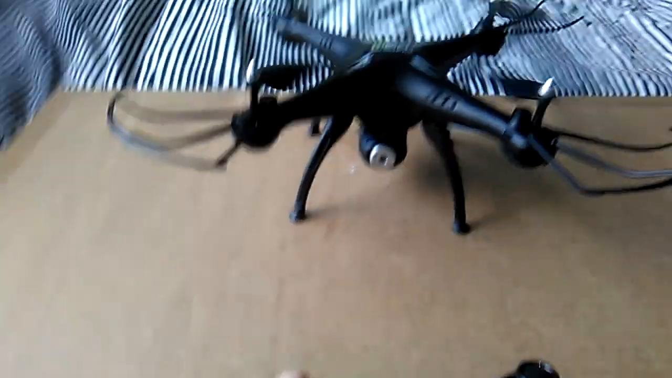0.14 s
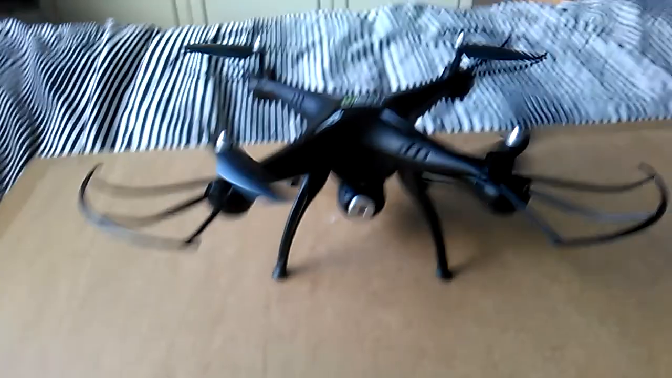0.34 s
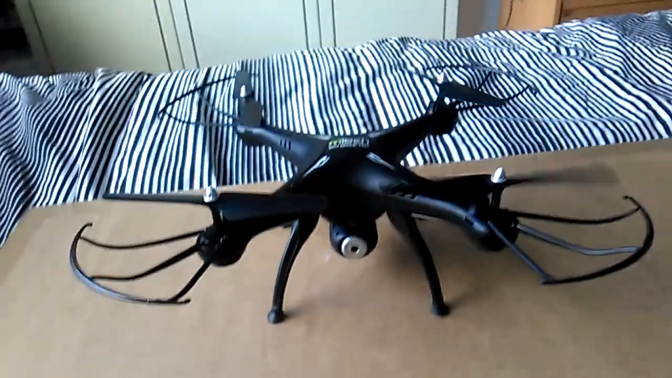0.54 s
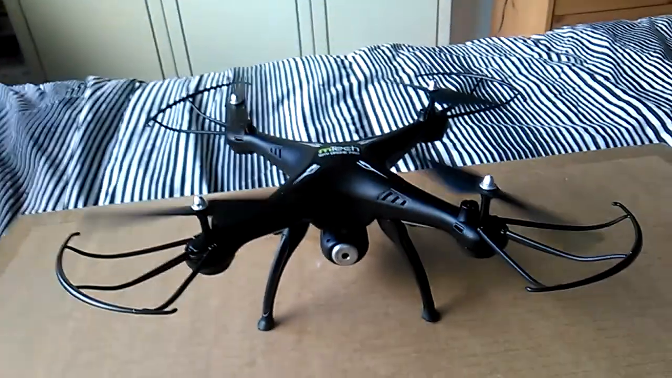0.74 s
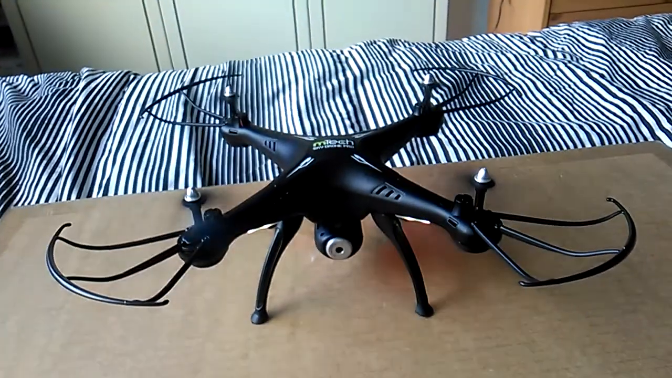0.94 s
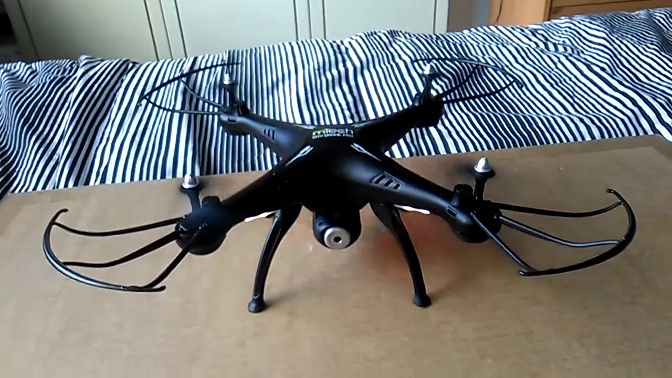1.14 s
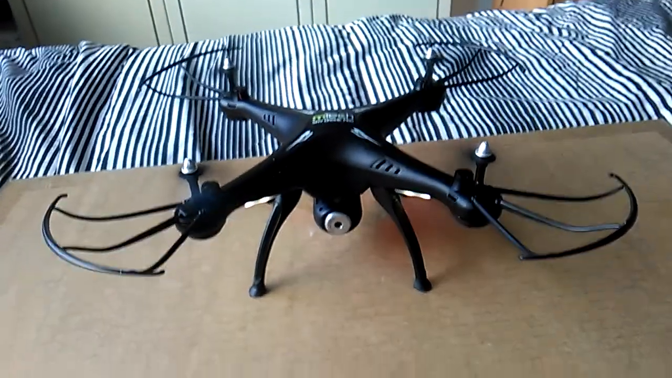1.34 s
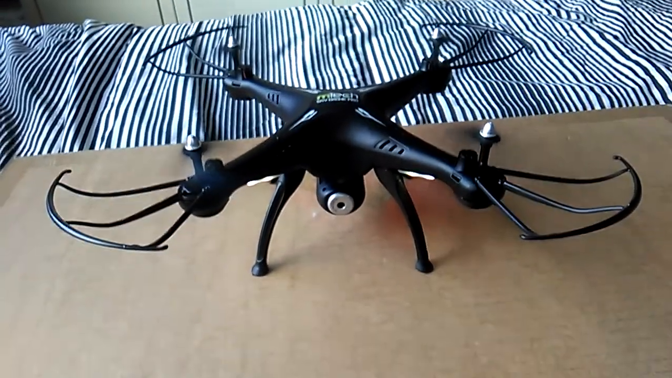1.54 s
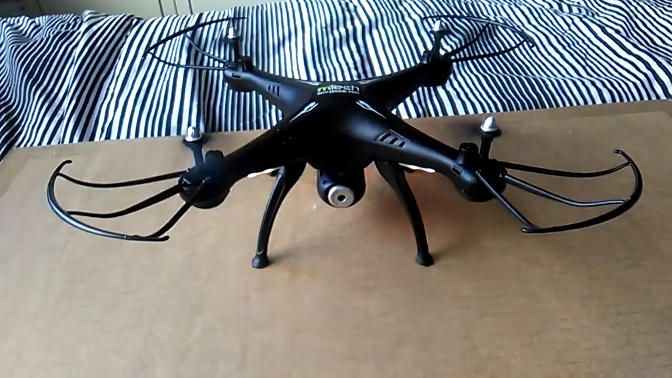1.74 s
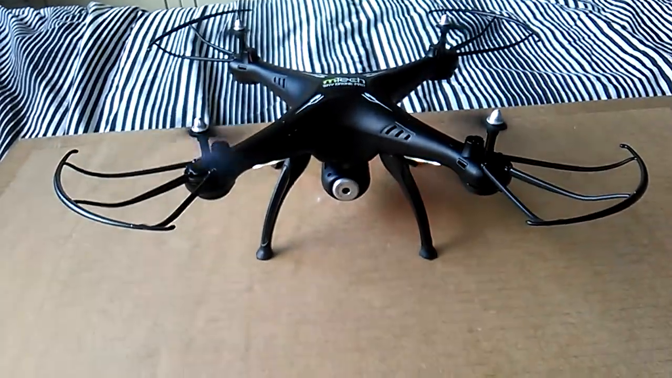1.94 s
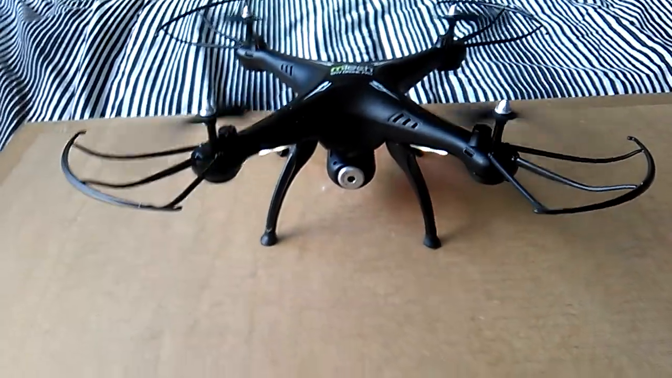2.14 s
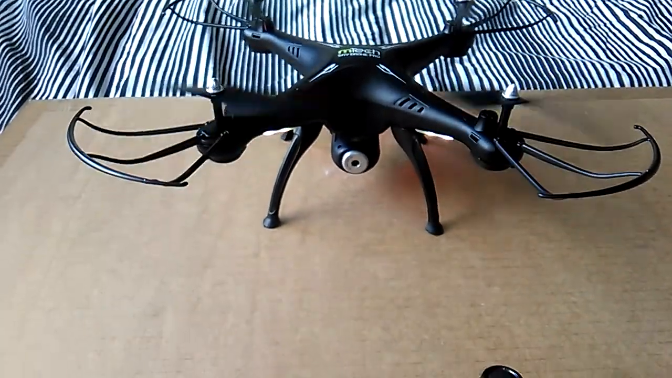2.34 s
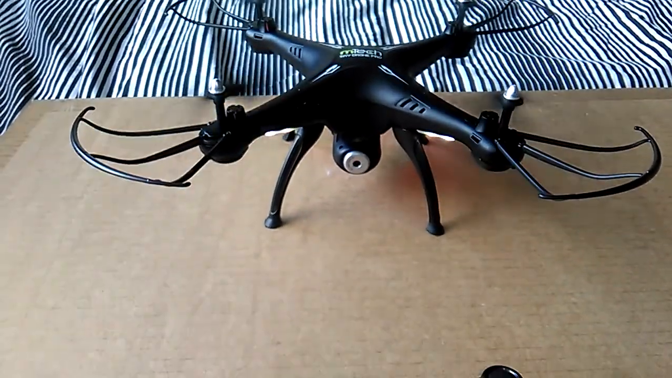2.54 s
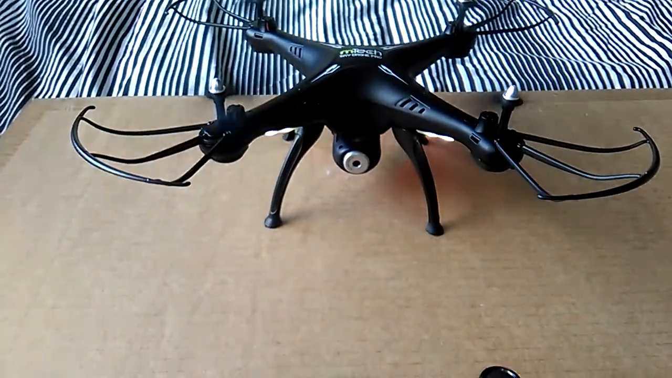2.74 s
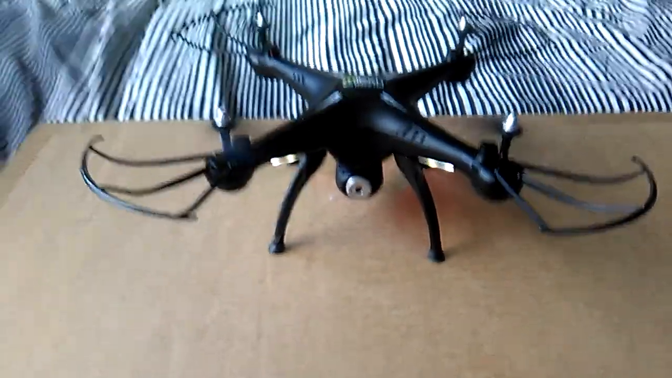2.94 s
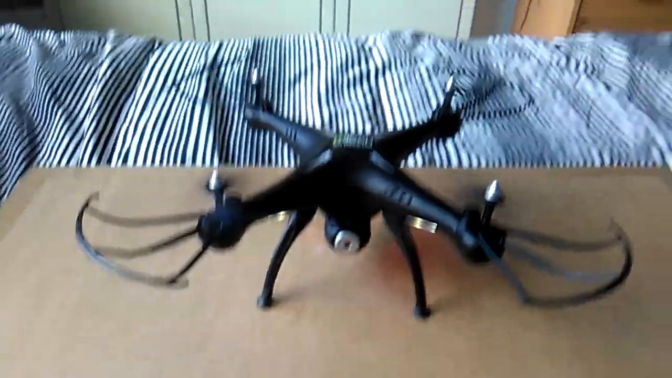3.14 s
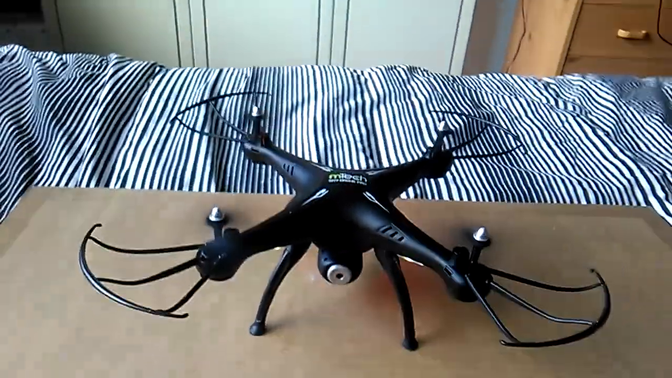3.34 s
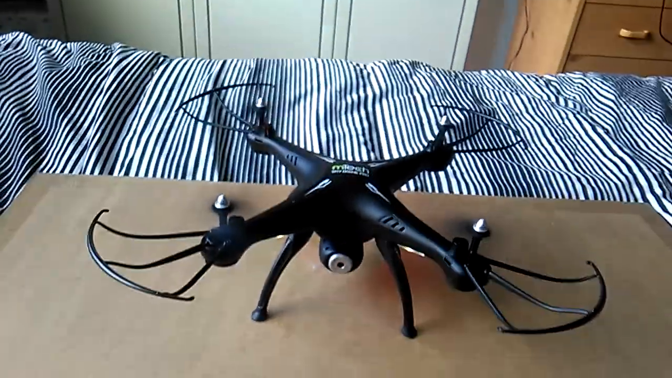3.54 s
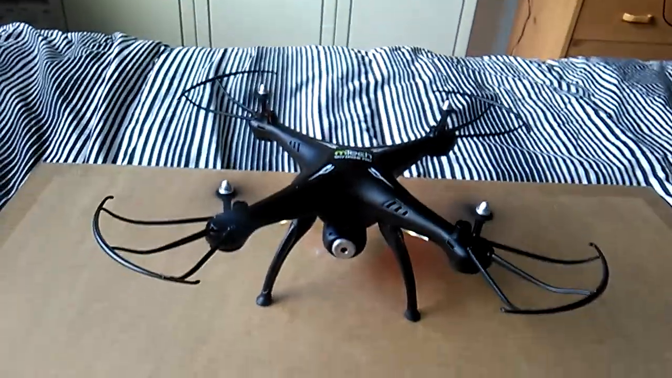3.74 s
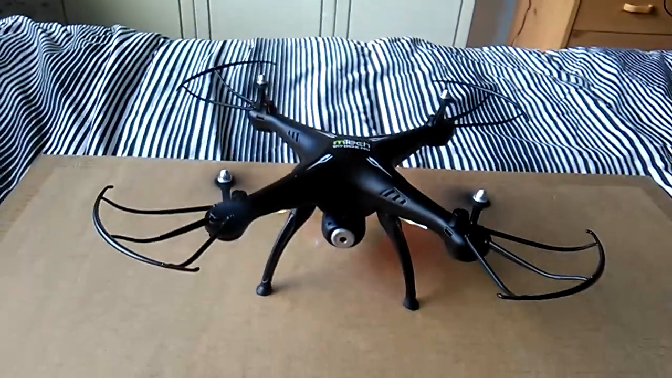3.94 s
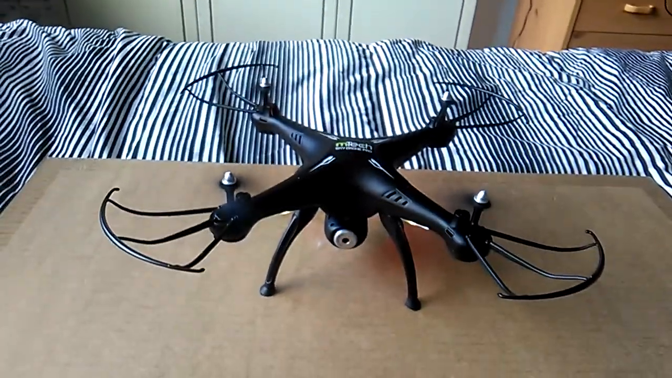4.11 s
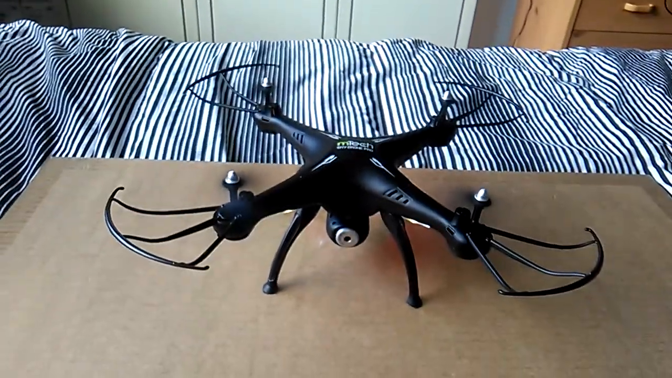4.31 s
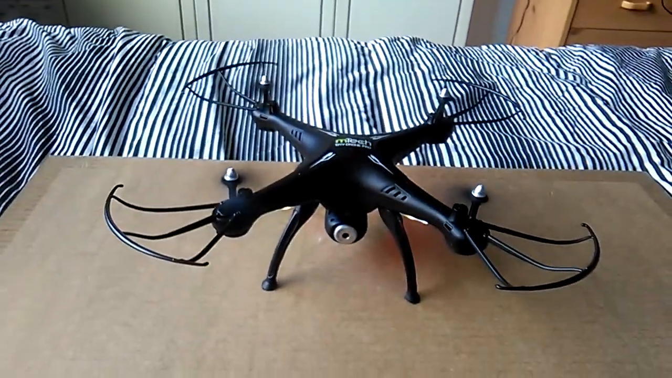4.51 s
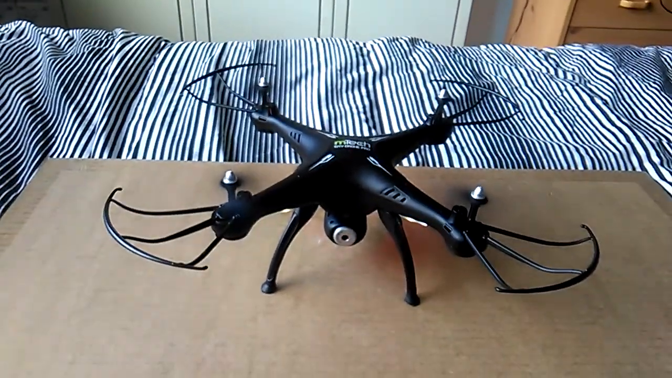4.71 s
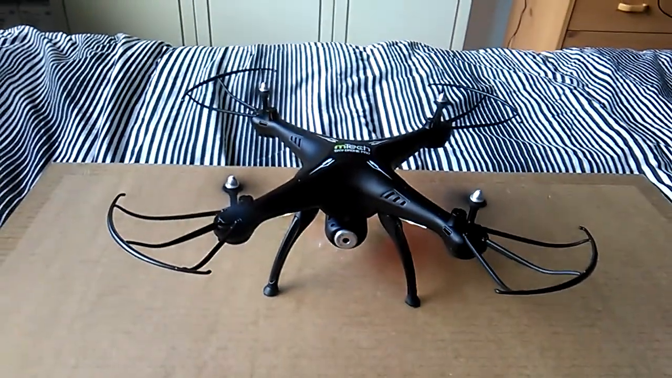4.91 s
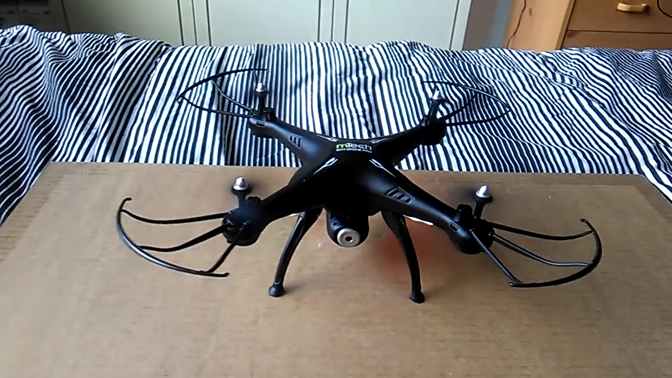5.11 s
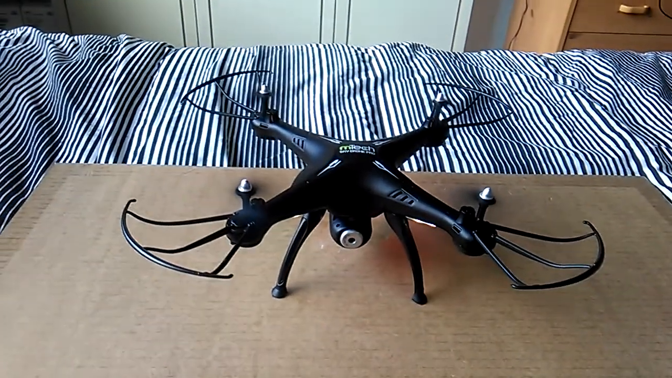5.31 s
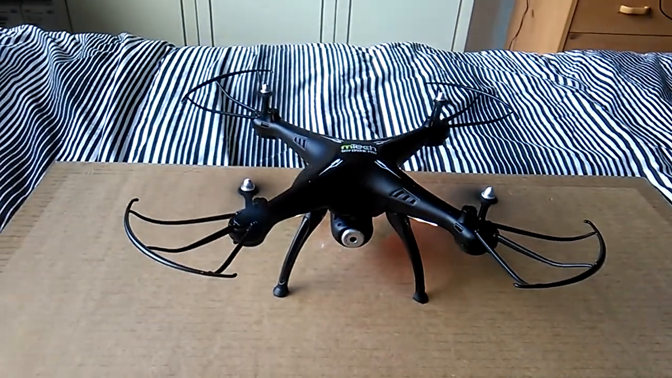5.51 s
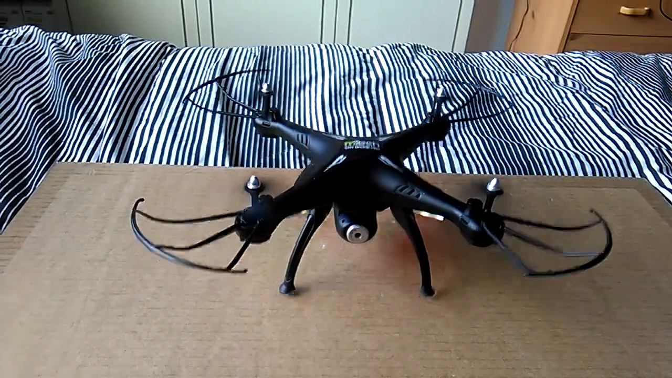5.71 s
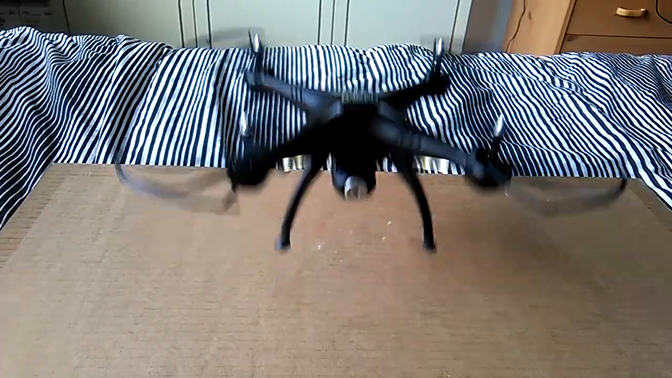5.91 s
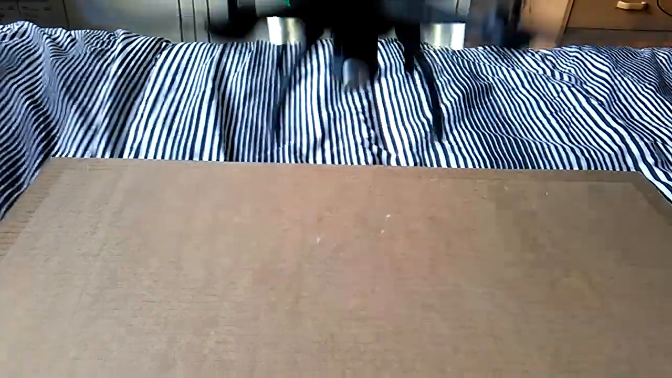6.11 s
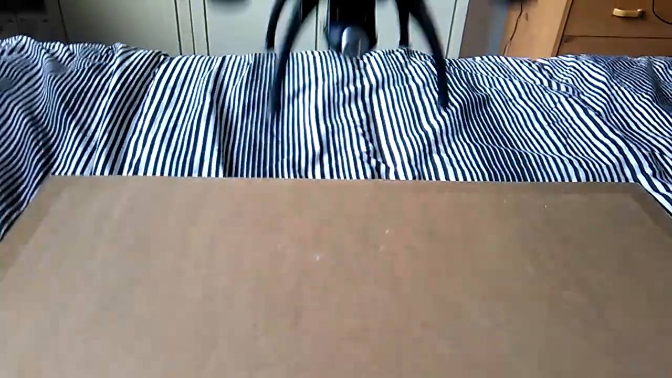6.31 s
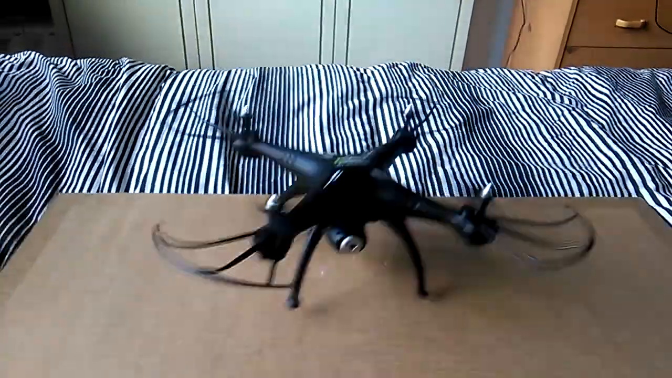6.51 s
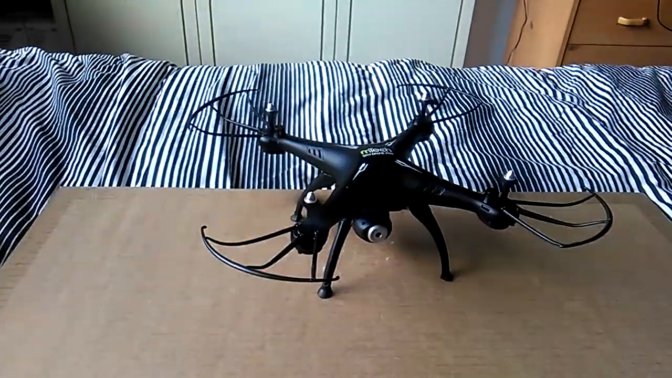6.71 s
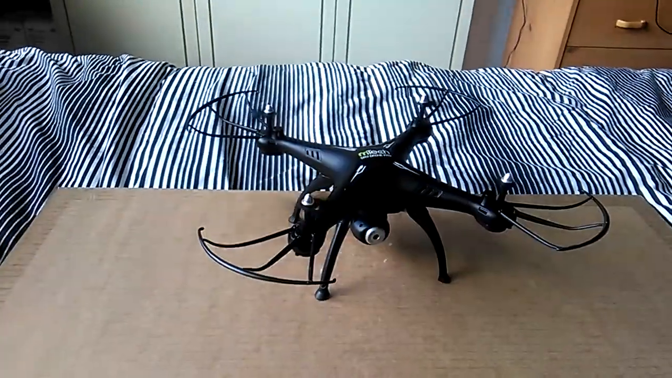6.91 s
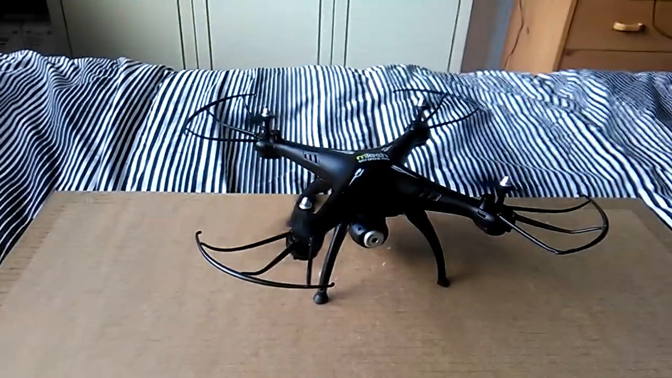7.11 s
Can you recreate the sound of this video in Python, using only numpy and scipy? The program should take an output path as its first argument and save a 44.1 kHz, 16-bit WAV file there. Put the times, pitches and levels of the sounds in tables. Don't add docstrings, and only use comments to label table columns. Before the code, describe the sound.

Indoors, close to the microphone, a toy quadcopter sits on a cardboard sheet. Its gears tick to a stop, then burst into a harsh plastic buzz that coasts down to clicks. They catch again, grind upward into a shrill whine, surge for a short hop, fade in pitch, and the craft crashes with a hollow thump and clatter.

```python
import sys
import numpy as np
from scipy import signal
from scipy.fft import rfft, irfft, next_fast_len
from scipy.io import wavfile
from scipy.ndimage import uniform_filter1d, minimum_filter1d

SR = 44100
rng = np.random.default_rng(int(sys.argv[2]) if len(sys.argv) > 2 else 0)


def dump(signal):
    limited = np.clip(np.atleast_2d(signal).T, -1, 1)
    pcm = np.round(limited * 32767).astype(np.int16)
    wavfile.write(sys.argv[1], SR, pcm)


def to_linear_factor(level_db):
    exponent = np.asarray(level_db, float) / 20
    return 10 ** exponent


N = 315519
TIME = np.arange(N) / SR
SIZE = next_fast_len(N + SR // 2)
HZ = np.maximum(np.arange(SIZE // 2 + 1) * SR / SIZE, 1)

PINION_TEETH, WHEEL_TEETH = 9, 54
STARTS_S = (0.84, 2.555)
TAKEOFF_S, LANDING_S = 6.26, 6.597
# frequency_hz, level_db (per Hz)
FRAME_COLOUR = [(470, -43), (800, -31.5), (942, -9), (1070, -6.5), (1390, -16), (1580, -14.5), (1710, -14),
                (2100, -13), (2380, -6.5), (2750, -2), (3300, 2.5), (3640, -1.5), (4610, -8), (7000, -21),
                (9100, -35), (15400, -120)]
# start_s, goal_hz (below zero = friction), lag_s, rattle_db, whine_db (relative)
STICK_MOVES = [(0, -40, 1.94, 0.5, -10.5), (.832, 28, 0.005, -11, -6), (.872, 230, .19, 8, -7),
               (1.0, 330, .12, 2, -6.5), (1.145, 100, 1.05, -1.5, -6), (1.58, -60, 0.73, 3, 0),
               (2.555, 212, 0.26, 3, -13), (4.055, 390, 0.16, -0.5, -5.5), (4.89, 505, .13, 0, -3.5),
               (5.125, 315, .035, -2, -9.5), (5.29, 475, 0.089, -0.5, -3.5), (5.70, 588, .095, 1.5, -7.5),
               (6.195, -20, 0.35, -2, 3.5), (6.6, -20, .35, 1.5, -30)]


def unit(x):
    return x / np.sqrt(np.mean(x ** 2))


def on_log(points):
    hz, value = np.transpose(points)
    return np.interp(np.log(HZ), np.log(hz), value)


def causal(db):
    cep = irfft(db * np.log(10) / 20, SIZE)
    cep[1:SIZE // 2] *= 2
    cep[SIZE // 2 + 1:] = 0
    return np.exp(rfft(cep))


def modes(rows):
    total = 0
    for k, (hz, width, db) in enumerate(rows):
        total = total + (-1) ** k * to_linear_factor(db) * 1j * HZ * width / (hz ** 2 - HZ ** 2 + 1j * HZ * width)
    return total


def through(x, response):
    return irfft(rfft(x, SIZE) * response, SIZE)[..., :N]


def band(x, edges_hz):
    return signal.sosfiltfilt(signal.butter(2, edges_hz, "bandpass", fs=SR, output="sos"), x)


def walk(rate):
    k = int(SR / rate)
    held = np.repeat(rng.standard_normal(N // k + 1), k)
    return 1.3 * uniform_filter1d(uniform_filter1d(held, k), k)[:N]


def ramp(start_s, length_s):
    return np.clip((TIME - start_s) / length_s, 0, 1)


def growth(hz, size):
    return uniform_filter1d(np.gradient(np.log(hz)) * SR, size=size)


def ports(x, pan_db):
    # frequency_hz, balance_db (left minus right)
    mic_balance = [(60, -1.5), (200, -.7), (690, .3), (1280, 3.5), (2360, 8), (4360, 9), (6400, 5),
                   (7600, -5), (9500, -10), (12000, -2), (14800, 0)]
    # frequency_hz, share common to both ports
    likeness = [(60, .93), (250, .95), (600, .84), (1000, .62), (2000, .22), (4000, .15), (8000, .02),
                (14000, .08)]
    room_t60_s, room_db = .12, -8
    t = TIME[:SR // 4]
    early = rng.standard_normal((2, len(t))) * to_linear_factor(-60 * t / .045)
    late = signal.lfilter([1], [1, -.7], rng.standard_normal((2, len(t)))) * to_linear_factor(-60 * t / room_t60_s)
    paths = rfft(unit(early) + to_linear_factor(room_db) * unit(late), SIZE)
    paths /= np.sqrt(uniform_filter1d(abs(paths) ** 2, size=250))
    like = np.clip(on_log(likeness), 0, .999)
    tilt = to_linear_factor(np.outer([.5, -.5], on_log(mic_balance) + pan_db))
    return through(x, (np.sqrt(like) + np.sqrt(1 - like) * paths) * tilt * 2 / tilt.sum(0))


def room_hush():
    # frequency_hz, level_db (per Hz)
    hush_colour = [(15, -38), (25, -5), (59, -5), (96, -2), (298, -9), (700, -23), (1820, -31), (4060, -33),
                   (4610, -24), (5250, -34), (12000, -31), (15600, -69), (22000, -120)]
    return unit(through(rng.standard_normal(N), to_linear_factor(on_log(hush_colour)))) * to_linear_factor(-65 + walk(5))


def distant_engine():
    start_s, end_s, start_hz, hz_per_s = 3.05, 6.58, 45.4, 6.9
    since = TIME - start_s
    turns = start_hz * since + hz_per_s * since ** 2 / 2
    swell = ramp(start_s, 0.97) * np.clip((end_s - TIME) / 0.033, 0, 1)
    tone = swell * to_linear_factor(-51 - 4 * walk(8)) * np.sin(2 * np.pi * turns + 0.46 * walk(8.1))
    rumble = unit(through(rng.standard_normal(N), modes([(42, 25, 0)]) ** 2))
    return tone + rumble * swell * to_linear_factor(-65 + 2 * walk(3.6))


def place(out, start_s, sound):
    out[int(start_s * SR):][:len(sound)] += sound


def fade(t, t60_s):
    return to_linear_factor(-60 * t / t60_s)


def crash_knocks(out, t):
    # start_s, peak_db, crack_db (relative)
    knocks = [(6.598, -0.5, -6.5), (6.608, -5, -14), (6.615, -12, -20), (6.622, -4, -29), (6.639, -25, -9),
              (6.658, -10.5, -25), (6.694, -16, -30), (6.707, -13, -30), (6.713, -18, -35),
              (6.722, -18, -25), (6.752, -20.5, -22), (6.773, -23, -20)]
    # pitch_hz, level_db, t60_s
    knock_modes = [(71.63, 0.5, 0.22), (106.76, -3.5, 0.2), (180, -11.5, 0.17), (272, -9, 0.1),
                   (420, -11, 0.2), (655, 0.5, 0.46), (732, -0.5, 0.1), (914, -2.5, 13), (940, -6, 0.15),
                   (1230, -43, 0.39), (1290, -48, 0.11)]
    sheet = signal.butter(3, [80, 4400], "bandpass", fs=SR, output="sos")
    for start_s, db, crack_db in knocks:
        ring = 0
        for hz, mode_db, t60_s in knock_modes:
            level_chance, pitch_chance = rng.standard_normal(2)
            tone = np.sin(2 * np.pi * hz * (1 + .03 * pitch_chance) * t)
            ring = ring + to_linear_factor(mode_db + 3 * level_chance) * tone * fade(t, min(t60_s, .06 + 3 / hz))
        rattle = signal.sosfilt(sheet, rng.standard_normal(len(t))) * fade(t, 0.072)
        crack = signal.lfilter([1], [1, -.55], rng.standard_normal(len(t))) * fade(t, 0.0092)
        place(out, start_s, to_linear_factor(db) * (ring / abs(ring).max() + 0.62 * rattle + .5 * to_linear_factor(crack_db) * crack))


def gear_jolts(out, t):
    # start_s, peak_db, pitch_hz, t60_s
    jolts = [(0.028, -39, 236, 0.23), (0.233, -33, 240, 0.15), (0.302, -42, 153, 0.13),
             (0.346, -40.5, 220, 0.092), (0.401, -48.5, 144.4, 0.33), (.55, -48, 137, 0.14),
             (0.899, -44, 249, 0.49), (1.049, -29.5, 1071, 0.28), (2.58, -44, 240, 0.13),
             (2.645, -35.5, 240, 0.28), (2.72, -38.5, 234.6, 0.24), (5.16, -36, 224.8, .12),
             (5.168, -29.5, 420, 0.054), (5.18, -26, 667, 0.039), (5.19, -37, 109, .15),
             (6.5, -35, 1075, 0.091), (6.797, -29, 499, .025), (6.804, -35.5, 1107, 0.24),
             (6.844, -34, 1096, .1), (6.867, -23, 599, 0.018), (6.887, -30, 563, .025)]
    for start_s, db, hz, t60_s in jolts:
        onset = 1 - np.exp(-t / 0.0036)
        place(out, start_s, to_linear_factor(db + 3.5) * onset * fade(t, t60_s) * np.sin(2 * np.pi * hz * t))


def tooth_pings(out, t):
    # start_s, peak_db, pitch_hz
    first_coast = [(0.03, -49, 3270), (0.0593, -47, 2310), (0.0937, -41, 2520), (0.1291, -41, 2390),
                   (0.1685, -46, 2390), (0.213, -43, 2440), (0.2299, -42, 3260), (0.2733, -49, 3390),
                   (0.2942, -46, 3380), (0.3237, -47, 3140), (0.3506, -52, 3370), (0.3783, -51, 2790),
                   (0.399, -46, 2560), (0.4179, -55, 3420), (0.461, -55, 3230), (0.4928, -54, 3100),
                   (0.5357, -47, 3120), (0.5878, -47, 3150), (0.6574, -48, 3250)]
    second_coast = [(1.7583, -16, 2950), (1.78, -24, 3252), (1.8242, -24, 3120), (1.8735, -23.5, 3295),
                    (1.9354, -25, 3400), (1.9743, -29, 3117), (2.0117, -22, 2347), (2.0346, -25.5, 2400),
                    (2.0596, -27, 4290), (2.0831, -27, 3374), (2.114, -25, 4400), (2.1431, -29, 2384),
                    (2.178, -32, 2393), (2.2144, -30, 2430), (2.2523, -32, 2370), (2.2891, -30, 3050),
                    (2.336, -36, 3055), (2.3575, -30, 3286)]
    last_coast = [(6.7867, -22, 4480), (6.8098, -22, 3170), (6.8347, -24, 3175), (6.914, -30, 3060),
                  (6.939, -31, 2404), (6.9632, -25, 2332), (6.986, -30, 2320), (7.0093, -38, 3153),
                  (7.1185, -39, 3184)]
    for start_s, db, hz in list(first_coast) + list(second_coast) + list(last_coast):
        onset = 1 - np.exp(-t / 0.00069)
        place(out, start_s, to_linear_factor(db - 1) * onset * fade(t, .035) * np.sin(2 * np.pi * hz * t))


def stick_spring(out, t):
    start_s, db, hz, t60_s = .664, -56, 4730, .36
    tone = np.sin(2 * np.pi * hz * t)
    tone += .3 * np.sin(2 * np.pi * 1.006 * hz * t) + .2 * np.sin(2 * np.pi * .935 * hz * t)
    place(out, start_s, to_linear_factor(db) * fade(t, t60_s) * (1 - np.exp(-t / 0.0037)) * tone)


def gear_ticks(out, t):
    # start_s, peak_db
    tick_times = [(0.0946, -59), (0.13, -55), (0.169, -52), (0.213, -59), (0.23, -40.5), (0.273, -48),
                  (0.3233, -49), (0.4185, -52), (0.46, -46.5), (0.492, -54), (0.536, -45), (0.5874, -52),
                  (0.657, -51.5), (0.8364, -36.5), (2.3578, -35), (2.386, -35), (2.4187, -32.5),
                  (2.452, -44), (2.474, -41), (2.4908, -36), (2.518, -52), (2.543, -37), (2.5603, -33),
                  (2.588, -32), (2.602, -34)]
    for start_s, db in tick_times:
        place(out, start_s, to_linear_factor(db + 10.5) * rng.standard_normal(len(t)) * fade(t, 0.02))


def hits():
    out, ticks, t = np.zeros(N + SR), np.zeros(N + SR), TIME[:SR // 2]
    crash_knocks(out, t)
    gear_jolts(out, t)
    tooth_pings(out, t)
    stick_spring(out, t)
    gear_ticks(ticks, t)
    low_cut = causal(-6 * np.log2(1 + (58 / HZ) ** 4))
    return ports(through(out[:N], low_cut) + through(ticks[:N], causal(on_log(FRAME_COLOUR))), 0)


def step(values):
    held = np.asarray(values)[np.searchsorted(np.transpose(STICK_MOVES)[0], TIME, side="right") - 1]
    return uniform_filter1d(held, size=int(0.22 * SR))


def shaft_speed(ratio, slower, climb_hz, climb_s):
    start_hz, stall_hz = 24.416, .6
    hz, now = np.zeros(N), start_hz
    ends = [row[0] for row in STICK_MOVES[1:]] + [N / SR]
    for (s, goal, lag, *_), end in zip(STICK_MOVES, ends):
        if goal > 550:
            goal, lag = climb_hz, climb_s
        elif goal > 300 and s > STARTS_S[1]:
            goal, lag = goal * ratio, lag * slower
        inside = (TIME >= s) & (TIME < end)
        hz[inside] = goal + (now - goal) * np.exp(-(TIME[inside] - s) / lag)
        now = max(goal + (now - goal) * np.exp(-(end - s) / lag), stall_hz)
    return np.maximum(hz, stall_hz)


def controls():
    # shaft_hz, frame_rattle_db, shaft_hum_db, blade_hum_db
    by_speed = [(0.605, -102, -90, -90), (5.04, -77, -90, -90), (22.8, -49, -90, -90),
                (49, -41.5, -80, -90), (109, -32, -86, -80), (159, -28.5, -50, -72),
                (214.3, -25, -46, -66.5), (240, -19.5, -35.5, -54.5), (269, -19.5, -47, -53.5),
                (364, -17.5, -51, -49.5), (475, -16.5, -49, -47.5), (577.9, -17, -51.5, -42.5)]
    hz = shaft_speed(1, 1.0, 632.0, 0.12)
    at, *laws = np.transpose(by_speed)
    frame_db, shaft_db, blade_db = (np.interp(np.log(hz), np.log(at), law) for law in laws)
    effort_db, whine_db = step(np.transpose(STICK_MOVES)[3]), step(np.transpose(STICK_MOVES)[4])
    octaves = np.log2(np.maximum(hz, 8) / 100)
    lifted_db = -27.5 * ramp(TAKEOFF_S, 0.12) * (TIME < LANDING_S)
    shake_hold_s, shake_fade_s = 0.09, 0.048
    shake = np.exp(-np.maximum(TIME - LANDING_S - shake_hold_s, 0) / shake_fade_s)
    shake *= to_linear_factor(4) * (TIME > LANDING_S)
    scrape = 0
    for s, fade_s in zip(STARTS_S, (0.039, 0.023)):
        scrape = scrape + (TIME > s) * np.exp(-abs(TIME - s) / fade_s) * to_linear_factor(2.5)
    board_db = 20 * np.log10(to_linear_factor(-15.5 - 3.5 * octaves + lifted_db) + shake)
    hiss_db = 20 * np.log10(to_linear_factor(-18 + 3.5 * octaves) + scrape)
    shaft_db = shaft_db + effort_db + lifted_db
    return hz, frame_db + effort_db, board_db, hiss_db, whine_db, shaft_db, blade_db + effort_db, lifted_db


def tooth_knocks(hz, turns):
    tooth = (turns * PINION_TEETH).astype(int)
    teeth = np.arange(tooth[-1] + 1)
    pinion_db = 2.1 * rng.standard_normal(PINION_TEETH)[teeth % PINION_TEETH]
    wheel = uniform_filter1d(rng.standard_normal(WHEEL_TEETH), size=9, mode="wrap")
    wheel_db = 10.0 * wheel[teeth % WHEEL_TEETH]
    loose_db = 1.55 * rng.standard_normal(len(teeth))
    strength = to_linear_factor(pinion_db + wheel_db + loose_db)[tooth] ** np.clip(190 / hz, 1, 1.3)
    since = turns * PINION_TEETH - tooth
    shape = np.exp(-since / np.clip(hz / 600, 0.06, 0.26)) + np.clip(hz / 250, 0.08, 0.33)
    knocks = strength * shape * rng.standard_normal(N)
    return knocks / np.sqrt(uniform_filter1d(knocks ** 2, size=SR // 6))


def mesh_whine(hz, turns, ninth_db, eighth_db, higher_db, fifth_db, sings_s):
    whine_orders = [(2, -19), (3, -25), (5, -7), (6, -16), (7, -14), (8, 0), (9, 0), (10, -5), (11, -12),
                    (15, -3), (16, -7), (18, -9), (19, 2)]
    slow = np.clip(214 / hz, 0, 1) ** 10
    thrust = ramp(sings_s[0], .1) * np.clip((sings_s[1] - TIME) / .06, -.4, 1)
    fast_db = -8 * np.clip((hz - 420) / 40, 0, 1)
    rising_db = -12 * np.clip((203 - hz) / 20, 0, 1)
    higher_db = higher_db * abs(thrust) + fast_db
    extra_db = {5: fifth_db, 8: eighth_db * abs(thrust), 9: ninth_db * thrust,
                10: higher_db, 11: higher_db, 18: rising_db, 19: rising_db}
    whine = 0
    for k, db in whine_orders:
        waver_db = (2.4 * walk(9) + 2.2 * walk(40)) * (1 - thrust / 2) * (.7 if k == 5 else 1)
        level = to_linear_factor(db + extra_db.get(k, 0)) * (slow if k > 11 else 1) * to_linear_factor(waver_db - 1.0)
        whine = whine + level * np.sin(2 * np.pi * (int(k) * turns + rng.random()))
    whine += .45 * walk(600) * np.sin(2 * np.pi * 8.5 * turns)
    gaining = np.clip(growth(hz, 2000) / 2, 0, 1) * np.clip((225 - hz) / 50, 0, 1)
    return whine + to_linear_factor(-1) * gaining * walk(500) * np.sin(2 * np.pi * 18 * turns)


def gearbox(hz, *singing):
    jitter = np.minimum(hz / 70000, 1500 / hz ** 2 + .001) * walk(9) + .002 * walk(60)
    turns = np.cumsum(hz * (1 + jitter)) / SR + rng.random()
    return tooth_knocks(hz, turns), mesh_whine(hz, turns, *singing), turns


def rattle_paths():
    # pitch_hz, width_hz, level_db
    frame_modes = [(2227, 270, -2), (3300, 770, 2.5), (4330, 2000, 2.5)]
    arm_rings = [(2380, 150, -1), (3290, 150, 1), (4650, 320, -4)]
    board_modes = [(153.5, 17.3, 6.5), (240, 60, 5.5), (1055, 63, 2), (518.4, 48, -6.5), (680, 30, -4.5),
                   (725, 61, -7), (848, 62, -6.5)]
    # frequency_hz, level_db (per Hz)
    hiss_colour = [(3000, -51.5), (4600, -8.5), (5500, 0.5), (6400, -0.5), (8200, -10.5), (10300, -19.5),
                   (13100, -31), (14300, -32)]
    frame = causal(on_log(FRAME_COLOUR) - 6 * np.log2(1 + (880 / HZ) ** 6))
    frame = frame * (1 + modes(frame_modes) * 0.5) * (1 + sum(modes([row]) for row in arm_rings))
    sheet = to_linear_factor(-10.0) * causal(-9 * np.log2(1 + (HZ / 1100) ** 2) - 12 * np.log2(1 + (60 / HZ) ** 2))
    low_board, upper_board = modes(board_modes[:3]), modes(board_modes[3:]) + sheet
    paths = np.array([frame, low_board, upper_board, causal(on_log(hiss_colour))])
    return paths / np.sqrt(np.mean(abs(paths) ** 2, axis=1))[:, None]


def frame_in_flight(out, hz):
    grounded = TIME < LANDING_S
    legs = band(out, (2072, 2871)) * 0.43 * ramp(5.307, 0.41) * grounded
    gaining = uniform_filter1d(1. * (np.gradient(hz) > 0), size=1500)
    out = out - band(out, (3130, 7460)) * gaining * np.clip(0.58 * (1 - (hz / 176) ** 2), 0, 1)
    free = ramp(6.2, 0.075) * grounded
    out = out - band(out, (3050, 3600)) * 0.45 * free
    for edges_hz in ((2500, 3300), (3300, 4200), (4200, 5300)):
        out = out + band(out, edges_hz) * (to_linear_factor(3 * walk(22) * free) - 1)
    return out - legs


def quadcopter():
    # speed ratio, rattle_db, pan_db (left minus right), whine_db
    motors = [(1.0, 0, 0, -2), (1.012, -2, 1, -3), (.972, -4, -1, -5), (1.03, -6, .5, -7)]
    trim = [(1, 1), (1.015, 1.5), (.97, 1.2), (.95, 1.3)]
    # goal_hz, lag_s, ninth_order_db, eighth_order_db, higher_orders_db
    climb = [(620, .32, 9, 6, -6), (582, .115, 6, -8, -6), (596, .32, 4, -6, -6), (545, .2, -8, -6, -6)]
    fifth_db = [3, -12, -14, -14]
    # start_s, end_s
    sings_s = [(5.95, 6.3), (5.68, 6.04), (5.78, 6.28), (5.72, 6.28)]
    # frequency_hz, level_db
    whine_path = [(300, -9), (850, -14), (1070, 5.5), (1350, -21), (2100, -21.5), (2330, -6.5),
                  (2600, -10.5), (2900, -13), (3200, 1), (3550, -0.5), (4200, -7), (4600, 0.5), (5350, 0),
                  (6000, -25), (9000, -30), (14000, -44)]
    # rotor order, level_db (against the blade hum)
    unbalance = [(4, -13), (7, -33), (8, -4.5)]
    hz, frame_db, board_db, hiss_db, whine_db, shaft_db, blade_db, lifted_db = controls()
    paths = rattle_paths()
    low_db = board_db + 2.5 - 2.34 * np.log2(np.maximum(hz, 40) / 100)
    upper_db = board_db - 0.5 + 2.57 * np.log2(np.clip(110 / hz, 1, 6))
    gains = to_linear_factor(frame_db + np.array([0 * hz, low_db, upper_db, hiss_db]))
    spinning = np.clip((hz - 70) / 60, 0, 1)
    out = 0
    for k, (ratio, db, pan_db, mesh_db) in enumerate(motors):
        own_hz = shaft_speed(*trim[k], *climb[k][:2]) * ratio
        load = np.clip(.85 + .6 * growth(own_hz, 3000), .3, 1)
        load = load * np.clip((TAKEOFF_S + .1 - TIME) / .1, .3, 1) * np.clip((hz - 110) / 70, 0, 1)
        knocks, whine, turns = gearbox(own_hz, *climb[k][2:], fifth_db[k], sings_s[k])
        rattle = (through(knocks, paths) * gains).sum(0)
        tone = through(whine, to_linear_factor(on_log(whine_path)))
        tone = tone * to_linear_factor(frame_db + whine_db + mesh_db) * spinning * load
        rotor = turns * PINION_TEETH / WHEEL_TEETH
        hum = to_linear_factor(shaft_db) * np.sin(2 * np.pi * turns) + to_linear_factor(blade_db) * np.sin(4 * np.pi * rotor)
        if k == 0:
            unbalance_db = np.maximum(blade_db + lifted_db, shaft_db - 6.0)
            for order, order_db in unbalance:
                hum += to_linear_factor(unbalance_db + order_db) * np.sin(2 * np.pi * int(order) * rotor)
        motor = to_linear_factor(db - 6.0) * rattle + 1.29 * tone + to_linear_factor(4.0 - 6.7 * k) * spinning * hum
        out = out + ports(motor, pan_db)
    return frame_in_flight(out, hz)


def scene():
    return ports(room_hush() + distant_engine(), 0) + hits() + quadcopter()


def band_limit(x):
    return signal.sosfilt(signal.butter(12, 15430, fs=SR, output="sos"), x)


def record(dry):
    gain = np.minimum(1, .86 / (abs(dry).max(0) + 1e-9))
    gain = uniform_filter1d(minimum_filter1d(gain, size=201), size=200)
    top_cut = signal.ellip(8, .2, 70, 14250, fs=SR, output="sos")
    mix = signal.sosfilt(top_cut, dry * gain)
    return band_limit(mix)


dry = scene()
out = record(dry)
dump(out)
```